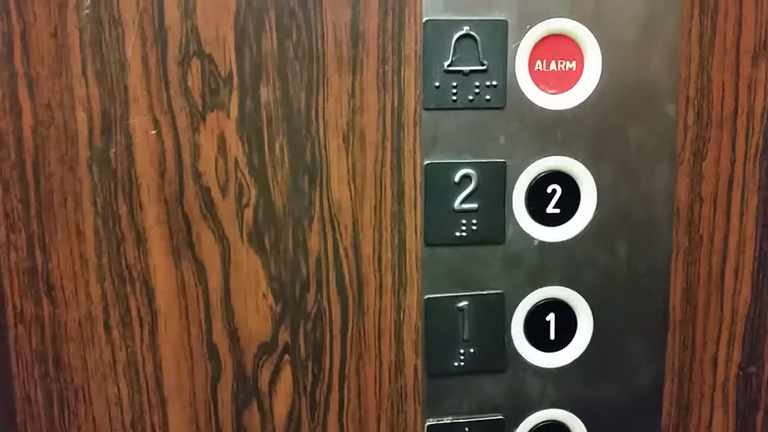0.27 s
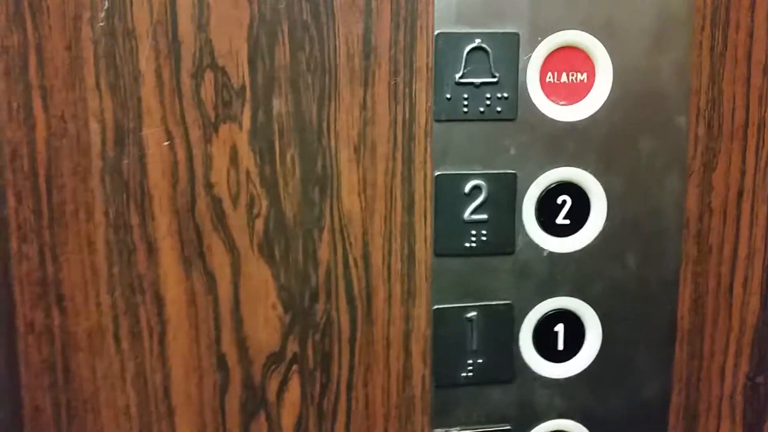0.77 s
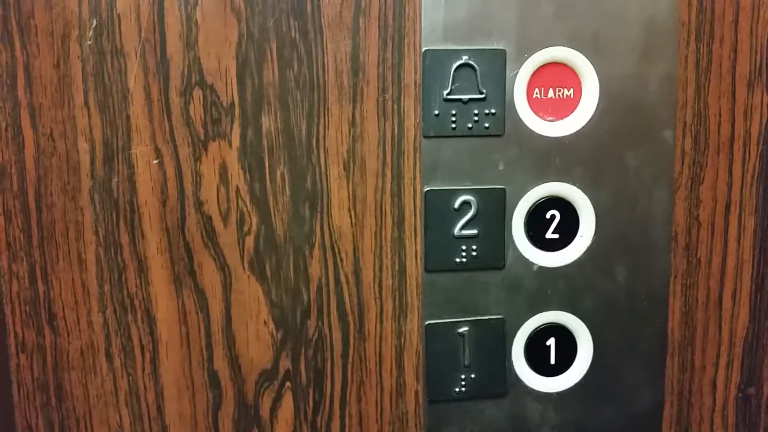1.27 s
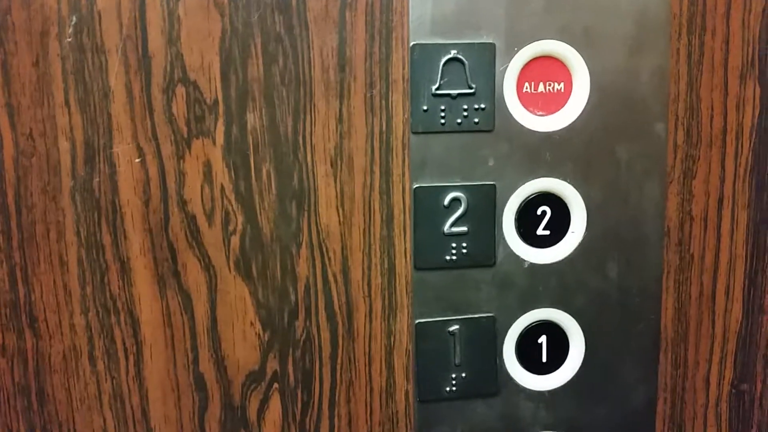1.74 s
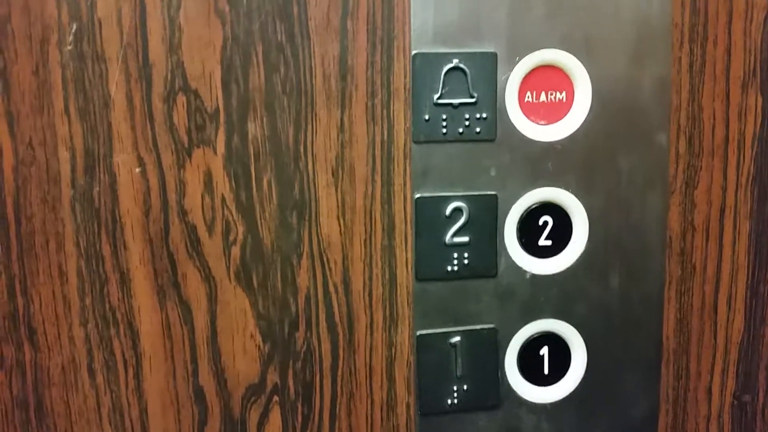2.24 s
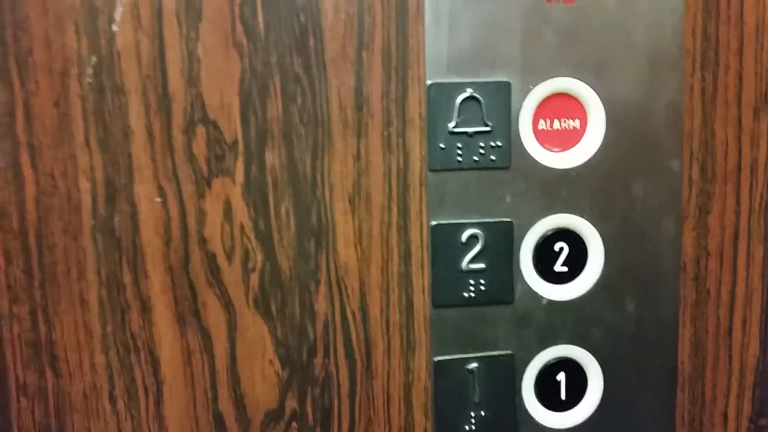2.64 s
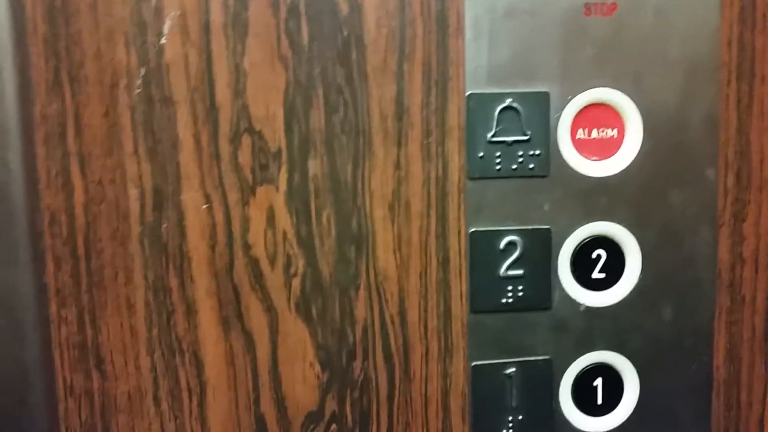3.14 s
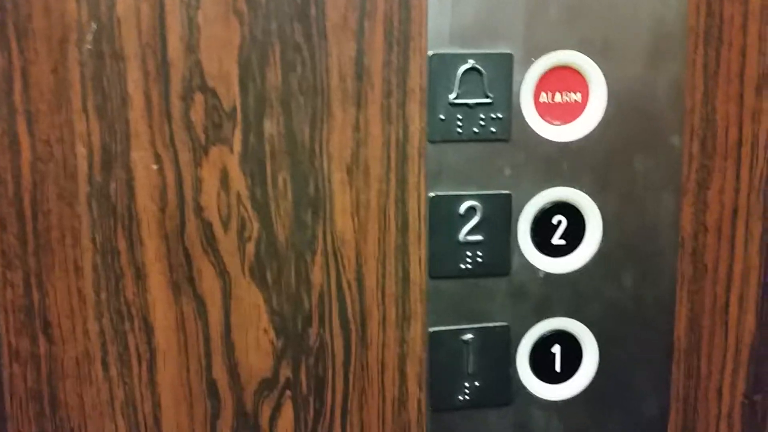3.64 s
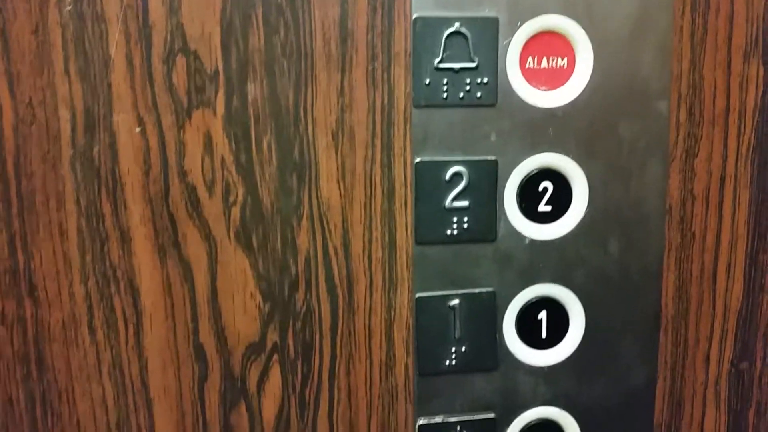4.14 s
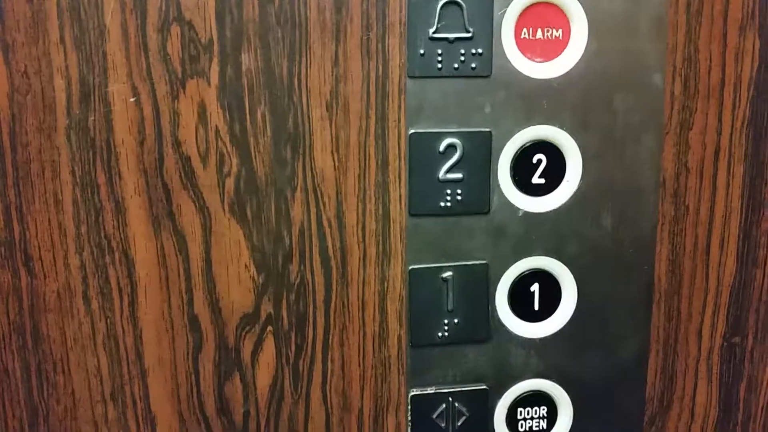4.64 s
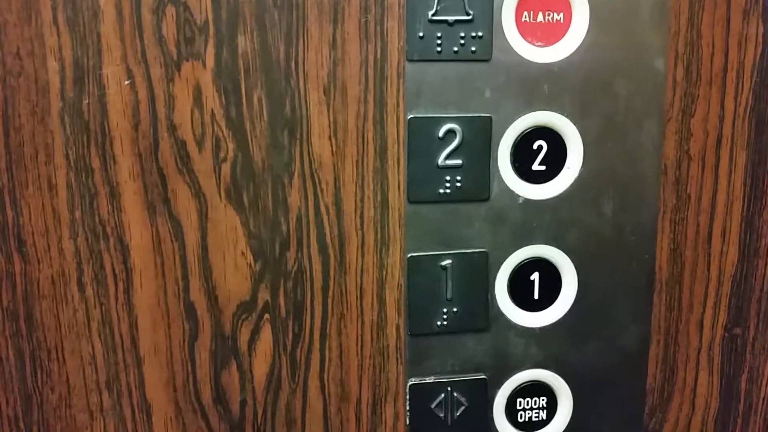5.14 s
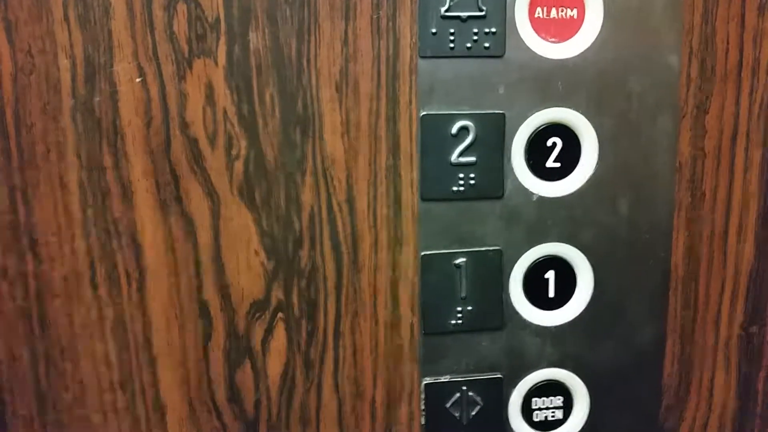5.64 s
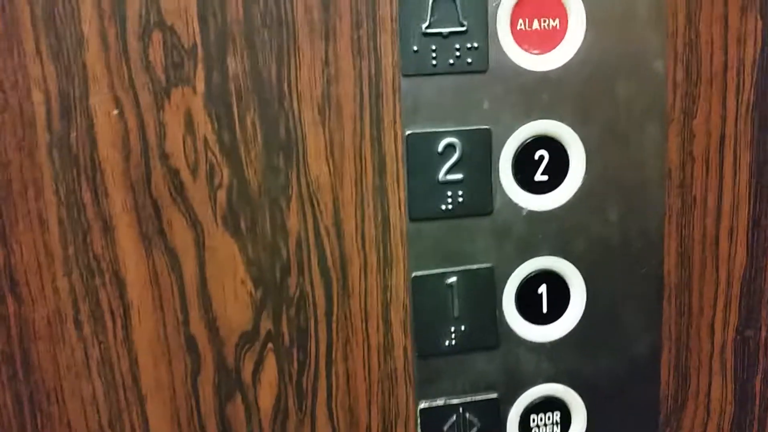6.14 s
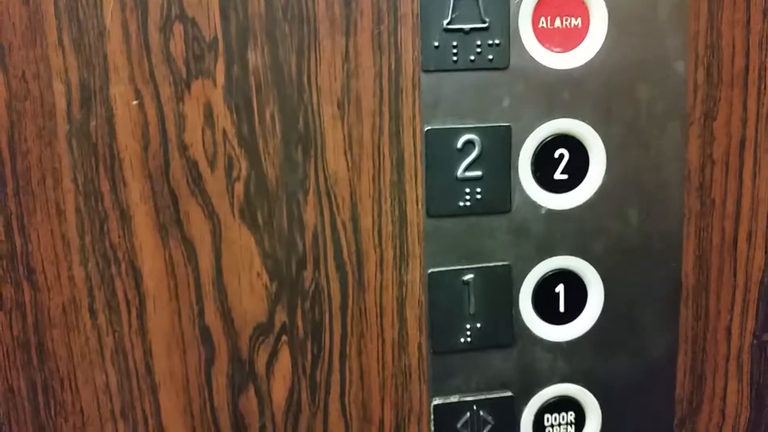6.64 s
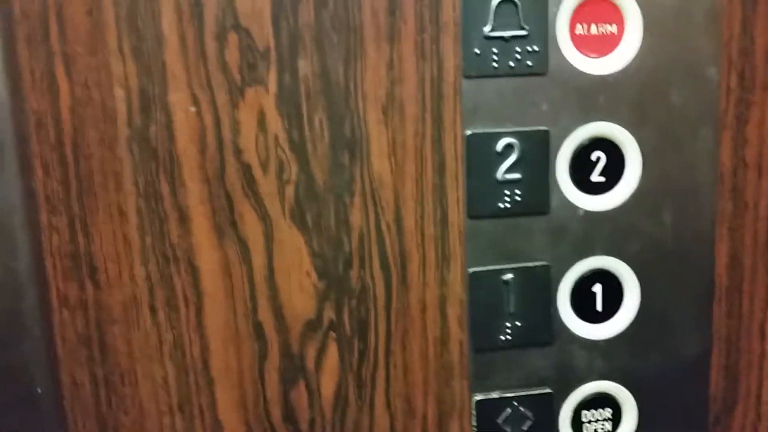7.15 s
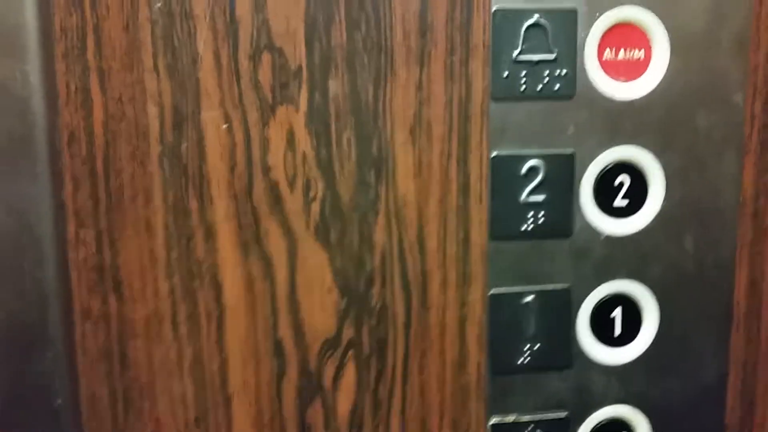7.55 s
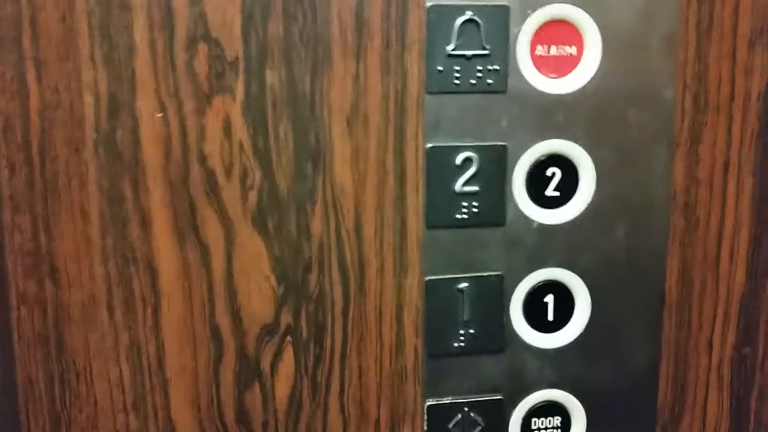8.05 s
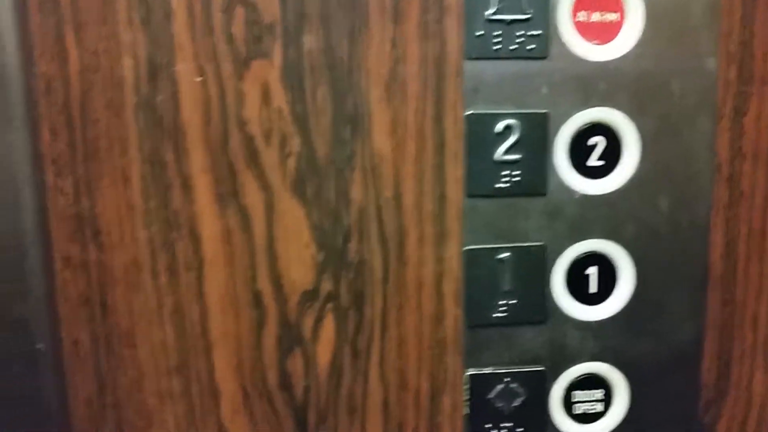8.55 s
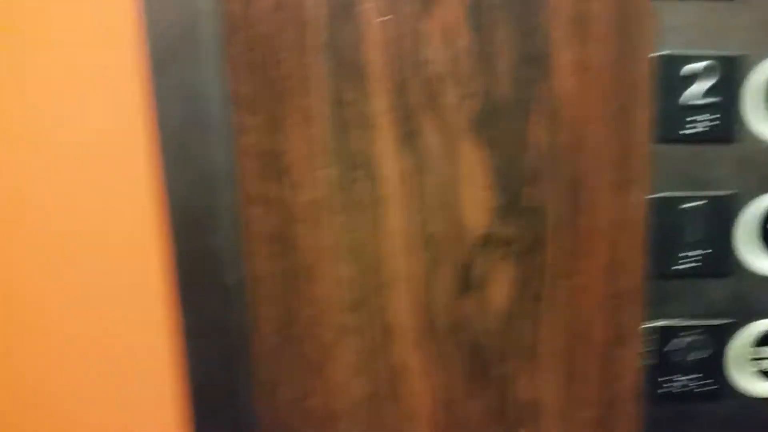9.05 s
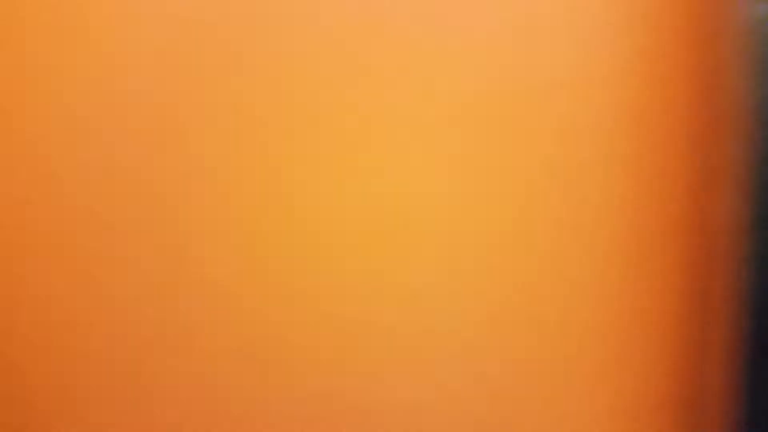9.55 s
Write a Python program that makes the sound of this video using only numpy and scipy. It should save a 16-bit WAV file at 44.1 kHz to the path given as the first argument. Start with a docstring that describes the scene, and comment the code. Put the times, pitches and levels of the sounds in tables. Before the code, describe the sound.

A hydraulic elevator's pump motor hums low and steady for about ten seconds, with a slight throb and a soft rumble underneath, heard on a phone inside the small panelled cab. The hum wavers at first, then settles. Faint, high squeaks come from the rail around 0.2 to 0.6 seconds and again near 1.1, with very faint ticking. At 1.3 seconds the cab gives a low, booming thump. From 1.5 seconds the phone case makes occasional tiny clicks close to the microphone. The hum is loudest from 4 to 5.4 seconds, with one sharp click at 5.3. A short, dull thump comes at 6.7 seconds, and a stronger one with a slight panel rattle at 7.7. A brief, soft rub follows at 8.3 seconds and another click at 9.3, while the hum continues to the end.

```python
"""A hydraulic elevator travels, heard on a phone in its small panelled cab. From the start the pump motor
hums at twice mains frequency and beats against its shaft's fifth order; a belt throbs, oil flow rumbles
over a faint electronic hiss. Guide shoes squeak and tick on the rail; the cab thumps at 1.3 s.
From 1.5 s the phone case clicks at times. The hum peaks at 4-5.4 s. Brief rubs follow from 5.7 s,
and two more thumps at 6.7 and 7.7 s."""
import sys
import numpy as np
from scipy import signal
from scipy.fft import rfft, irfft, next_fast_len
from scipy.io import wavfile

SR = 44100
rng = np.random.default_rng(int(sys.argv[2]) if len(sys.argv) > 2 else 0)


def unload_audio(sound):
    """Save the sound as a 16-bit wav file, at the path given as the first command line argument."""
    columns = np.transpose(np.atleast_2d(sound))
    # keep every value between -1 and 1, then stretch to whole-number steps
    steps = np.round(np.clip(columns, -1, 1) * 32767)
    wavfile.write(sys.argv[1], SR, steps.astype(np.int16))


N = 432621
TIME = np.arange(N) / SR
FFT_SIZE = next_fast_len(N + SR, True)
FREQ = np.maximum(np.arange(FFT_SIZE // 2 + 1) * SR / FFT_SIZE, 1)
SIDES = np.array([[1], [-1]])  # left, right
PORT_GAP_S = 0.15 / 343  # travel time between the microphone ports


def amp(db):
    """Decibels to gain."""
    return 10 ** (np.asarray(db) / 20)


def unit(x):
    """Scale to rms 1."""
    return x / np.sqrt(np.mean(x ** 2))


def curve(points):
    """(time_s, value) points, joined linearly."""
    return np.interp(TIME, *np.transpose(points))


def slope(points):
    """(freq_hz, gain_db) points, joined on a log-frequency axis."""
    hz, db = np.transpose(points)
    return np.interp(np.log(FREQ), np.log(hz), db)


def bumps(resonances):
    """Gain in dB of (centre_hz, width_hz, lift_db) resonances."""
    return sum(db / (1 + (2 * (FREQ - hz) / width_hz) ** 2) for hz, width_hz, db in resonances)


def colour(x, gain_db):
    """Filter with one gain per frequency."""
    return irfft(rfft(x, FFT_SIZE) * amp(gain_db), FFT_SIZE)[..., :N]


def walk(rate_hz):
    """Random wander, spread near 1."""
    return 1.1 * np.interp(TIME * rate_hz, np.arange(8192), rng.standard_normal(8192))


def strike(start_s, rise_s, t60_s):
    """Blow envelope: quick rise, exponential decay."""
    age_s = np.clip(TIME - start_s, 0, 2 * t60_s)
    return (1 - np.exp(-age_s / rise_s)) * np.exp(-np.log(1000) * age_s / t60_s)


def swell(start_s, length_s):
    """Slide envelope: one arch."""
    return np.sin(np.pi * np.clip((TIME - start_s) / length_s, 0, 1))


def modes(table, start_s):
    """Sines of (pitch_hz, level_db) modes, random phases."""
    return sum(amp(db) * np.sin(2 * np.pi * (hz * (TIME - start_s) + rng.random()))
               for hz, db in table) / 2


def diffuse(density_db):
    """Noise from all sides at two ports: alike in the bass, unrelated in the treble."""
    coherence = np.sinc(2 * FREQ * PORT_GAP_S)
    mid, side = rfft(rng.standard_normal((2, FFT_SIZE)))
    spectra = mid * np.sqrt(1 + coherence) + SIDES * side * np.sqrt(1 - coherence)
    return irfft(spectra * amp(density_db) * np.sqrt(SR) / 2, FFT_SIZE)[:, :N]


def walls(x, t60_s, direct):
    """Dense reflections between close panels, different at each port."""
    age_s = TIME[:SR // 2]
    tail = rng.standard_normal((2, len(age_s))) * np.exp(-np.log(1000) * age_s / t60_s)
    return direct * x + signal.fftconvolve(x[None], unit(tail) / np.sqrt(len(age_s)))[:, :N]


def orders(turn_hz, table, wander, flutter_db, flutter_hz):
    """Partials of a turning part: speed wanders, each partial flutters on its own."""
    turns = np.cumsum(turn_hz * (1 + wander * walk(1.52))) / SR
    out = 0
    for order, db in table:
        hz = order * turn_hz
        lag_cycles = SIDES * rng.choice([-1, 1]) * hz * PORT_GAP_S / 4
        depth_db = flutter_db * np.clip(hz / 150, 1, 2.5)  # shorter waves vary more as the phone sways
        gain = amp(db + depth_db * walk(flutter_hz))
        out += gain * np.sin(2 * np.pi * (order * turns + rng.random() + lag_cycles))
    return np.sqrt(2) * out


def ripple(depth_db=1.8, spacing_hz=9):
    """Many small cab modes dent the spectrum above the bass, differently per port."""
    rows = rng.standard_normal((2, 8192))
    dents = np.array([np.interp(FREQ / spacing_hz, np.arange(8192), row) for row in rows])
    return depth_db * dents * np.clip(FREQ / 400 - 1, 0, 1)


def rumble_and_hiss(gain_db=0.02, surge_db=1.0):
    """Oil and air rumble through the cab's resonances, over a faint high electronic hiss."""
    # rumble, then hiss from 7 kHz up: freq_hz, density_db
    floor = [(15, -79), (30, -57), (62, -65), (100, -62), (205, -67), (340, -66), (600, -69.5),
             (950, -70.5), (1200, -81), (2600, -86.5), (3100, -94), (4300, -97), (7000, -119.5),
             (15500, -114.8)]
    # air and panel resonances: centre_hz, width_hz, lift_db
    cab = [(79.7, 6.6, 10), (128.7, 41.8, 19), (182.6, 31.2, 14.5), (229, 18, 13.5), (265.9, 13, 11.5),
           (292.5, 8.9, 12.5), (365, 27, 7), (401, 15, 12.5), (529.5, 26, 8.5), (667, 7.3, 7.5),
           (823.7, 13, 8), (2280, 960, 4)]
    return diffuse(slope(floor) + bumps(cab) + ripple()) * amp(gain_db + surge_db * walk(4.2))


def ticks(t60_s=0.19, chatter_hz=9.3, chatter_db=-68.3, fade_db_per_s=1.7):
    """Shoes catch on the rail: dry ticks over a faint, nearly regular, fading chatter."""
    # catches: start_s, level_db
    catches = [(.04, -66.5), (.438, -63), (0.576, -61), (1.304, -59.5), (1.402, -63), (1.654, -65.5),
               (2.223, -65.5)]
    blows = np.zeros(N)
    for start_s, db in catches:
        blows[int(start_s * SR)] = amp(db)
    for k, (jitter, size_db) in enumerate(rng.normal(0, [.12, 1.8], (120, 2))):
        start_s = abs(k + jitter) / chatter_hz
        if start_s * SR < N:
            blows[int(start_s * SR)] += amp(chatter_db - fade_db_per_s * start_s + size_db)
    envelope = signal.lfilter([1], [1, -np.exp(-np.log(1000) / (t60_s * SR))], blows)
    tick_db = slope([(1500, -14.5), (4500, 4), (7000, -12.5), (9500, -1), (11000, -1.5),
                     (12500, -12), (15000, -19.5)])
    return envelope * unit(diffuse(tick_db))


def rubs(grain_db=3):
    """Short grainy scuffs with a papery top; the cab rings after."""
    # rubs: start_s, length_s, level_db, rustle_db
    strokes = [(5.746, .17, -70, -2.5), (6.6, 0.24, -68, -3), (8.273, 0.074, -45.5, -18)]
    # scuff spectrum: freq_hz, gain_db
    scuff_shape = [(300, -7.5), (1100, 0.5), (1900, 5), (3000, -3.5), (4200, -9), (6000, -18.5),
                   (9000, -28.5), (15000, -39)]
    rustle_shape = [(5000, -8.5), (9000, -1.5), (11500, 2.0), (13500, -6.5), (15500, 2.5)]
    scuff = unit(colour(rng.standard_normal(N), slope(scuff_shape)))
    rustle = unit(colour(rng.standard_normal(N), slope(rustle_shape)))
    out = sum(amp(db) * swell(start_s, length_s) * (scuff + amp(rustle_db) * rustle)
              for start_s, length_s, db, rustle_db in strokes)
    return walls(out * amp(grain_db * walk(150)), t60_s=.33, direct=.44)


def squeaks(octave_db=-16, grain_db=3):
    """A shoe sticks and slips: a rough whistle plus octave, smeared by the walls."""
    # slips: start_s, length_s, from_hz, to_hz, level_db, roughness_ratio
    slips = [(0.222, 0.045, 5020, 4720, -52.5, 0.013), (0.241, 0.078, 4533, 4553, -40.5, 0.024),
             (0.416, .06, 4800, 4690, -50.5, 0.018), (0.455, 0.16, 4710, 4770, -55.5, 0.007),
             (1.13, 0.13, 4470, 4490, -43, 0.03), (1.283, 0.035, 1400, 1430, -37.5, 0.14),
             (1.317, 0.037, 1020, 845, -48, 0.07)]
    out, shake = 0, walk(900)
    for start_s, length_s, from_hz, to_hz, db, roughness in slips:
        glide_hz = np.interp(TIME, [start_s, start_s + length_s], [from_hz, to_hz])
        phase = 2 * np.pi * np.cumsum(glide_hz * (1 + roughness * shake)) / SR
        whistle = np.sin(phase) + amp(octave_db) * np.sin(2 * phase)
        out += amp(db) * swell(start_s, length_s) * whistle
    return walls(out * amp(grain_db * walk(300)), t60_s=.33, direct=.45)


def clicks(splinter_db=-19, echo_db=-15):
    """The phone case snaps in the hand, near one port; its hollow body rings."""
    # snaps: start_s, level_db, left_minus_right_db
    snaps = [(1.489, -47, 23.5), (2.764, -44, 16), (2.834, -40, -16.5), (3.465, -52, 22), (4.04, -48, 18),
             (5.337, -21.5, -11), (6.604, -50.5, 30), (7.884, -44.5, 21.5), (9.164, -48.5, 25),
             (9.3185, -32, -11)]
    # case modes: pitch_hz, level_db
    case_modes = [(480, -7), (730, -5), (1500, -12), (1720, -12)]
    blows, ring = np.zeros((2, N)), 0
    for start_s, db, pan_db in snaps:
        blow = amp(splinter_db) * strike(start_s, .0001, .0083) * rng.standard_normal(N)
        blow[int(start_s * SR)] += 1
        blows += amp(db + SIDES * pan_db / 2) * blow
        ring += amp(db) * modes(case_modes, start_s) * strike(start_s, .0003, .04)
    crack = colour(blows, slope([(300, 16.5), (900, 19), (2000, 7.5), (4000, 1), (6500, -5.5),
                                 (9000, 1), (12000, -5.5), (15000, -2.5)]))
    return crack + ring + amp(echo_db) * walls(crack.mean(axis=0), t60_s=.15, direct=0)


def thumps(clack_db=2, rattle_db=-3):
    """A jolt sets the cab's low modes booming; the panels clack and rattle."""
    # jolts: start_s, level_db, knock_db, boom_t60_s
    jolts = [(1.3, -19, -21.5, 0.89), (6.673, -16.5, -31, .28), (7.662, -12, -12, 0.43)]
    # low cab modes: pitch_hz, level_db
    cab_modes = [(124, -6), (163, -3), (186, 0), (220, -3), (258, -8), (290, -6.5), (312, -7.5), (388, -10)]
    # panel modes: pitch_hz, level_db
    panel_modes = [(612, -5.5), (660, 2), (735, -5.5), (797, -9), (892, -5.5), (968, -7), (1050, -10),
                   (1140, -14), (1410, -15.5)]
    # panel rattle spectrum: freq_hz, gain_db
    rattle_shape = [(250, -24), (520, -10.5), (650, 7.5), (1000, -2.5), (1500, -10), (2200, -25.5),
                    (4500, -32), (7000, -46.5), (10000, -40.5), (15000, -49)]
    out, noise = 0, unit(diffuse(slope(rattle_shape)))
    for start_s, db, knock_db, t60_s in jolts:
        boom = modes(cab_modes, start_s) * strike(start_s, .0056, t60_s)  # cab air builds up slower
        clack = amp(clack_db) * modes(panel_modes, start_s) * strike(start_s, .00076, t60_s=.12)
        rattle = amp(rattle_db) * noise * strike(start_s, .0017, t60_s=.3)
        out += amp(db) * (boom + amp(knock_db) * (clack + rattle))
    return out


def belt(turn_hz=8.78):
    """The drive belt throbs in low partials of its turning rate."""
    # belt partials: order, level_db
    partials = [(2, -62), (3, -41), (4, -41.5), (4.5, -43.5), (5, -39), (6, -53), (9, -40), (12, -44.5)]
    # throb strength: time_s, gain_db
    throb = [(0, 4), (4, -1.8), (6.4, -3), (7.7, 3), (8.5, 0), (9.15, 1), (9.81, -4.5)]
    return amp(curve(throb)) * orders(turn_hz, partials, wander=.003, flutter_db=1.2, flutter_hz=2.5)


def pump_shaft(turn_hz=28.51):
    """Shaft vibration, carried into the cab by the piston."""
    # shaft partials: order, level_db
    partials = [(1, -44), (3, -45.5), (4, -45), (5, -26.5), (6, -46), (8, -46), (9, -60), (10, -58),
                (11, -50), (13, -56.5), (14, -43), (17, -54.5), (20, -57.5), (32, -65), (44, -59)]
    # vibration in the cab: time_s, gain_db
    vibration = [(0, -1), (1, 1.5), (3, -2), (4.8, 2.5), (5.4, 2.5), (5.9, -1), (6.8, 1.6), (9.81, 2)]
    return amp(curve(vibration)) * orders(turn_hz, partials, wander=.0006, flutter_db=.9, flutter_hz=4)


def motor_hum(hum_hz=119.95, gain_db=3, unsteady_db=.97, waver_hz=2.3, crest_s=.54, settle_s=2.7):
    """Magnetic hum at twice mains frequency; its waver dies as the cab settles."""
    # hum strength: time_s, level_db
    strength = [(0, -29.5), (1.7, -25), (2.6, -24.5), (3.82, -25), (4.12, -22), (5.38, -20.5), (5.7, -24.5),
                (7.7, -23.5), (9.81, -26.5)]
    depth = 0.5 * np.exp(-TIME / settle_s)
    waver = 1 + depth * np.cos(2 * np.pi * waver_hz * (TIME - crest_s))
    level = amp(curve(strength) + gain_db + unsteady_db * walk(5))
    return np.sqrt(2) * level * waver * np.sin(2 * np.pi * hum_hz * TIME)


def scene():
    """Everything heard in the cab."""
    machinery = pump_shaft() + belt() + motor_hum()
    return machinery + rumble_and_hiss() + thumps() + squeaks() + ticks() + rubs() + clicks()


def record(dry, cutoff_hz=15800):
    """The ports colour each side and ring in the high treble; the phone cuts the top."""
    # port imbalance: freq_hz, left_minus_right_db
    imbalance = [(210, -2), (330, -5.5), (410, -2.5), (470, 3.5), (590, 11.5), (660, -1.5), (900, 3),
                 (1300, 1), (2700, 2.5), (4500, 9.5), (5500, 13.5), (8200, 6.5), (10000, -12.5),
                 (13500, -1.3)]
    ring_db = bumps([(9600, 1000, 6.9), (10650, 1200, 5.5)])
    heard = colour(dry, SIDES * slope(imbalance) / 2 + ring_db)
    return signal.sosfilt(signal.ellip(10, .2, 70, cutoff_hz, fs=SR, output="sos"), heard)


dry = scene()
out = record(dry)
unload_audio(out)
```